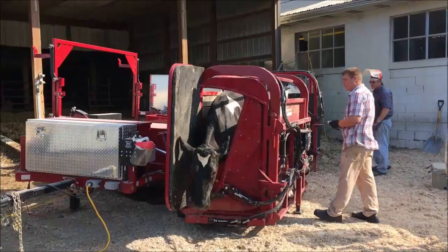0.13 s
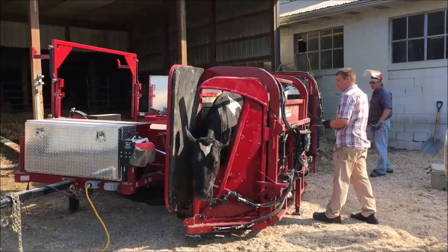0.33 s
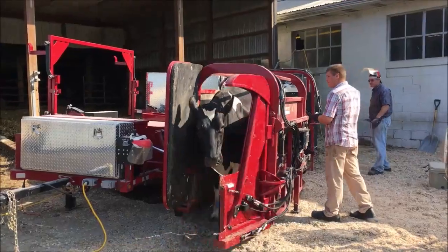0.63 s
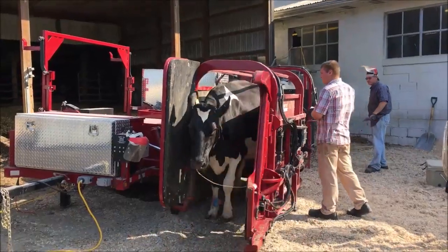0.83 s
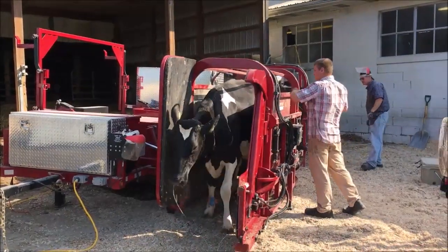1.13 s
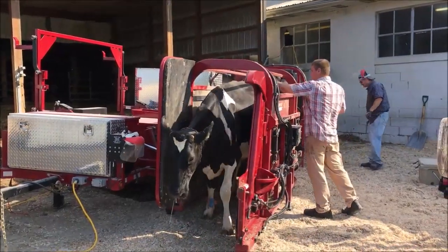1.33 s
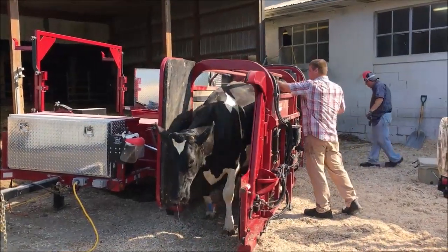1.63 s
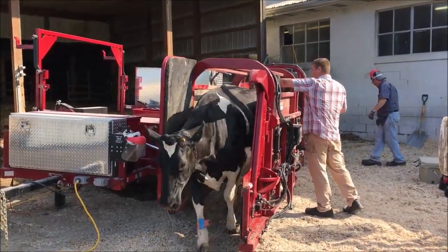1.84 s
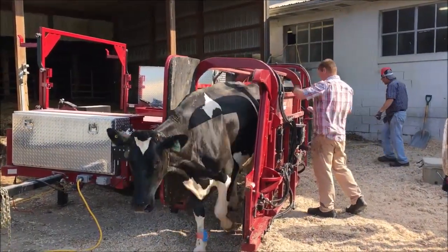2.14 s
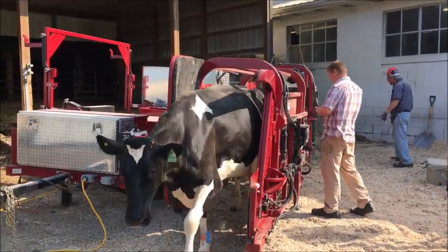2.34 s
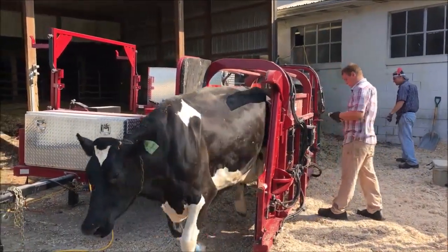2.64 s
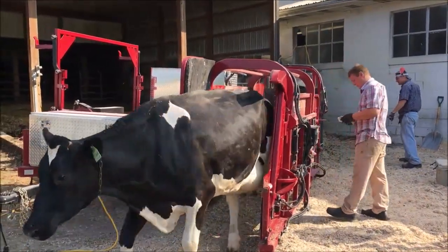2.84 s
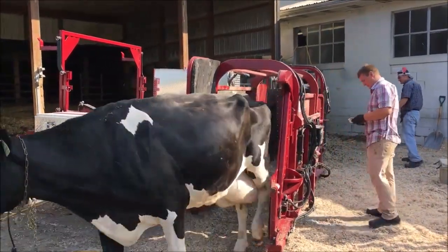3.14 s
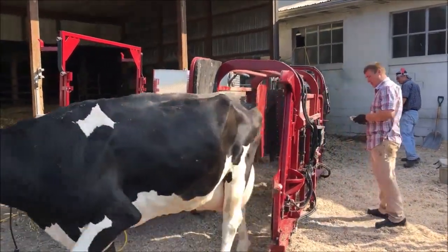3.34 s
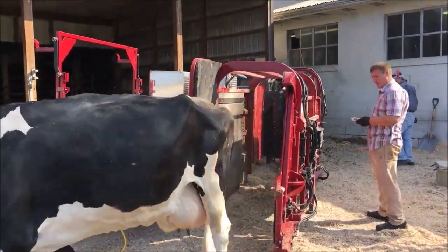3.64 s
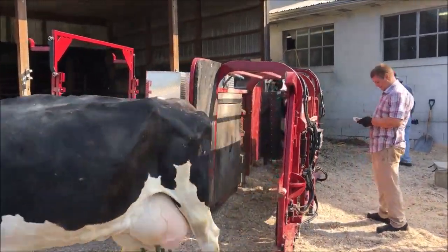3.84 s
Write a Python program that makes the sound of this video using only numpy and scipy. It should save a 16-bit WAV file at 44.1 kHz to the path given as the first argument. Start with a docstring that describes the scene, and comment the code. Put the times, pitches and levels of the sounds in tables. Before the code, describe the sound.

A steel cattle chute rattles, then its latch clatters and the gate bangs repeatedly in a barnyard. A hinge squeaks briefly and hooves knock and scuff on gravel, while machinery noise and wind on the microphone build.

```python
"""A steel cattle chute rattles as a cow leaves it in a barnyard. Impacts excite the modes of the metal:
the head gate's frame bangs, its latch clatters and loose fittings tick, while stick-slip friction
makes a hinge squeak. Hooves knock on the resonant hollow floor and scuff the gravel.
Behind it the broadband rush of machinery fades in from silence as the recorder's gain rises,
and turbulent wind buffets the microphone."""
import sys
import numpy as np
from scipy import signal
from scipy.fft import rfft, irfft
from scipy.io import wavfile
from scipy.ndimage import uniform_filter1d

SR = 44100
rng = np.random.default_rng(int(sys.argv[2]) if len(sys.argv) > 2 else 0)


def waveform_to_disk(signal):
    """Save audio, clipped to [-1, 1], as 16-bit WAV at the path in sys.argv[1]."""
    frames = np.transpose(np.atleast_2d(signal))
    scaled = np.clip(frames, -1, 1) * 32767
    samples = np.round(scaled).astype(np.int16)
    wavfile.write(sys.argv[1], SR, samples)


N = 176400


def undb(db):
    """Decibels to amplitude ratio."""
    return 10 ** (np.asarray(db) / 20)


def unit(x):
    """Normalise to rms 1."""
    return x / np.sqrt(np.mean(x ** 2))


def curve(points):
    """Linear interpolation through (seconds, value) points."""
    return np.interp(np.arange(N) / SR, *np.array(points).T)


def colour(x, points, tilt=0, top_hz=16000):
    """Spectral shaping by (Hz, dB) points, tilted in dB per octave up to top_hz; rms 1."""
    octave = np.log2(np.fft.rfftfreq(len(x), 1 / SR) + 1)
    hz, db = np.array(points).T
    slope = tilt * np.clip(octave, np.log2(hz[1]), np.log2(top_hz))
    return unit(irfft(rfft(x) * undb(np.interp(octave, np.log2(hz), db) + slope), len(x)))


def lowpass(x, hz):
    """Zero-phase filtering keeps the part of x below hz."""
    return signal.sosfiltfilt(signal.butter(2, hz, fs=SR, output="sos"), x)


def grains(size, grit=0.59):
    """Granular noise: tiny contacts whose strengths spread log-normally with grit."""
    noise, strength = rng.standard_normal((2, size))
    return noise * np.exp(grit * strength)


def walk(rate):
    """Smooth random fluctuation of rms 1, with rate new values a second."""
    hold = int(SR / rate)
    steps = np.repeat(rng.standard_normal(N // hold + 1), hold)
    return unit(uniform_filter1d(uniform_filter1d(steps, hold), hold)[:N])


def fade(t, t60):
    """Exponential damping by 60 dB in t60 seconds."""
    return np.exp(-np.log(1000) * t / t60)


def add(out, start, x):
    """Superpose x on out from start seconds."""
    i = int(start * SR)
    out[i:i + len(x)] += x[:max(N - i, 0)]


def ripple(x, depth_db, spacing_hz=44.81):
    """Dense fixed resonances form an uneven minimum-phase response of unit mean power."""
    f = np.fft.rfftfreq(N, 1 / SR)
    peaks = np.interp(f / spacing_hz, np.arange(2048), rng.standard_normal(2048))
    db = depth_db * peaks * f / (f + 900)  # smoother in the bass
    cepstrum = irfft(np.log(undb(db)), N)
    response = np.exp(rfft(2 * cepstrum * (np.arange(N) < N // 2)))
    return irfft(rfft(x) * response / np.sqrt(np.mean(np.abs(response) ** 2)), N)


def bursts(rows, shape, grit, rise):
    """Transient noise: grains filtered by shape peak at rise times their length, then decay."""
    out, t = np.zeros(N), np.arange(SR // 2) / SR
    for start, db, length in rows:
        age = t / (length * rise)
        burst = colour(grains(len(t), grit), shape) * age * np.exp(1 - age)
        add(out, start, undb(db) * burst / np.sqrt(np.sum(burst ** 2) / (2 * length * rise * SR)))
    return out


# Spectrum of the rush. Each row: frequency in Hz, spectral density in dB.
RUSH_SPECTRUM = [(30, -15), (120, -9.5), (250, 4.5), (370, -9), (520, -0.5), (700, 0.5), (870, -1.5),
                 (1100, -1), (1300, -1), (2000, -3), (3200, -7), (5000, -15.5), (6000, -15.5),
                 (9200, -17.5), (10400, -20), (11500, -16.5), (16000, -19.5)]
# Fan and pump resonances. Each row: frequency in Hz, half-width in Hz, level in dB against the rush.
WHIR_RESONANCES = [(451, 22, -23), (682, 33, -16.5), (1007, 59, -14), (1117, 37, -16), (3080, 35, -24.5),
                   (4370, 74, -28)]
# Fade-in of the rush as the recorder's gain rises. Each row: time in seconds, level in dB.
RUSH_FADE_IN = [(0, -125), (.145, -110), (.175, -70), (.3, -58.5), (.45, -61), (.68, -57.5), (.95, -51),
                (1.3, -48.5), (1.7, -47), (2.2, -45.5), (2.7, -44.5), (3.05, -41.5), (3.4, -42), (4, -41)]


def machinery(hiss_hz=6000, flicker_db=0.92):
    """Broadband noise with fan and pump resonances fades in and brightens as the recorder's gain rises."""
    rush = ripple(colour(grains(N, grit=0.3), RUSH_SPECTRUM), depth_db=3.5)
    body = lowpass(rush, hiss_hz)
    hiss = (rush - body) * undb(-4.5 + 0.5 * np.arange(N) / SR)  # gains 0.5 dB a second on the body
    f = np.fft.rfftfreq(N, 1 / SR)
    air = rfft(rng.standard_normal(N))
    whir = sum(undb(db) * unit(irfft(air / (1 + ((f - hz) / width) ** 2), N))
               for hz, width, db in WHIR_RESONANCES)
    return (body * undb(flicker_db * walk(24.905)) + hiss + whir) * undb(curve(RUSH_FADE_IN))


# Knocks of the cow on floor and panels. Each row: start in seconds, level in dB, length in seconds.
PANEL_KNOCKS = [(0.227, -50, .015), (0.246, -44.5, 0.0091), (0.493, -51, 0.013), (0.517, -38.5, 0.016),
                (.571, -44, 0.023), (2.902, -40.5, 0.041), (2.998, -45, .012), (3.095, -41.5, .025)]
# Panel resonances. Each row: frequency in Hz, bandwidth in Hz, level in dB.
PANEL_RESONANCES = [(401, 134, -5.5), (593, 100, -1), (744, 120, -2.5), (1400, 340, -11.5)]


def panels(grit=0.38, rise=0.36):
    """Forced vibration: blunt contacts drive broad resonances of the hollow floor and side panels."""
    out, t = np.zeros(N), np.arange(SR // 4) / SR
    for start, db, length in PANEL_KNOCKS:
        age = t / (length * rise)
        force = grains(len(t), grit) * age * np.exp(1 - age)
        boom = np.zeros(len(t))
        for hz, width, mode_db in PANEL_RESONANCES:
            band = signal.butter(2, [hz - width / 2, hz + width / 2], "bandpass", fs=SR, output="sos")
            boom += undb(mode_db) * unit(signal.sosfilt(band, force))
        add(out, start, undb(db) * boom / np.sqrt(np.sum(boom ** 2) / (2 * length * rise * SR)))
    return out


# Ticks of loose fittings. Each row: start in seconds, level in dB, centre frequency in Hz.
FITTING_TICKS = [(0.23, -53.5, 7700), (.255, -51, 8150), (0.347, -55, 8500), (.467, -46, 4180),
                 (.444, -53, 12000), (0.559, -43, 9900), (0.588, -53, 11200), (0.975, -39, 11600),
                 (1.171, -38, 9700), (1.281, -46, 6800), (1.397, -32.5, 10600), (1.504, -45, 11000),
                 (1.679, -44.5, 8200), (1.882, -49, 8950), (2.775, -42.5, 14000), (3.255, -39, 13100),
                 (3.514, -37.5, 13000)]


def fittings(attack_s=0.0023, t60=0.037, half_width_octaves=0.73):
    """Light impacts of chain and hose fittings radiate quickly damped bands of high-frequency noise."""
    out, t = np.zeros(N), np.arange(SR // 8) / SR
    f = np.fft.rfftfreq(len(t), 1 / SR) + 1
    for start, db, hz in FITTING_TICKS:
        band = 1 / (1 + (np.log2(f / hz) / half_width_octaves) ** 2)
        tick = unit(irfft(rfft(grains(len(t))) * band, len(t)))
        add(out, start, undb(db) * tick * (1 - np.exp(-t / attack_s)) * fade(t, t60))
    return ripple(out, depth_db=2)


# Partials of the squeak. Each row: start in seconds, length in seconds, frequency in Hz, level in dB.
HINGE_PARTIALS = [(0.231, .045, 7700, -61), (0.246, 0.032, 8620, -61), (1.876, 0.021, 11400, -57),
                  (1.881, 0.08, 9250, -47.5), (1.878, 0.089, 5814, -54), (1.892, 0.092, 4750, -61),
                  (1.921, .045, 8900, -52), (1.96, 0.12, 8720, -64), (1.935, 0.063, 10465, -62)]
# Scrapes of the hinge. Each row: start in seconds, level in dB, length in seconds.
HINGE_SCRAPES = [(1.878, -51, 0.029), (1.95, -53, .04)]
# Spectrum of a scrape. Each row: frequency in Hz, spectral density in dB.
SCRAPE_SPECTRUM = [(300, -10), (1500, 13), (3500, -2), (5500, 4), (8000, -5), (12000, 0), (16000, -18)]


def hinge(waver=0.0026, roughness=0.46):
    """Stick-slip friction sustains thin, uneven partials that swell and die, with brief scraping noise."""
    squeak = np.zeros(N)
    for start, length, hz, db in HINGE_PARTIALS:
        n = int(length * SR)
        pitch = hz * (1 + waver * walk(700)[:n])
        jitter = walk(400)[:n] + 1j * walk(410)[:n]  # in amplitude and phase
        grip = (1 + roughness * jitter) / np.sqrt(1 + 2 * roughness ** 2)
        partial = np.imag(grip * np.exp(2j * np.pi * np.cumsum(pitch) / SR))
        add(squeak, start, undb(db) * np.hanning(n) * partial)
    return squeak + bursts(HINGE_SCRAPES, SCRAPE_SPECTRUM, grit=0.35, rise=0.54)


def struck_steel(blows, spectrum, modes, attack_s, crash_t60, tail_t60, tilt_top_hz):
    """Impact excites a crash of dense modes and a few longer rings; the barn adds a duller tail."""
    out, t = np.zeros(N), np.arange(SR // 2) / SR
    hz, mode_db, ring_t60 = np.array(modes).T[:, :, None]
    for start, db, tilt, ring_db in blows:
        crash = colour(grains(len(t)), spectrum, tilt, tilt_top_hz) * fade(t, crash_t60)
        tail = colour(rng.standard_normal(len(t)), spectrum, tilt - 3.5, tilt_top_hz) * fade(t, tail_t60)
        scatter, detune, phase = rng.standard_normal((3, len(modes), 1))  # no two blows ring alike
        gain = undb(mode_db + 3 * scatter + tilt * np.log2(hz))
        pitch = hz * (1 + 0.008 * detune)
        partials = gain * fade(t, ring_t60) * np.sin(2 * np.pi * (pitch * t + phase))
        ring = partials.sum(0) / np.sqrt(np.sum(gain ** 2) / 2)
        onset = 1 - np.exp(-t / attack_s)
        add(out, start, undb(db) * onset * (crash + undb(-10) * tail + undb(ring_db) * ring))
    return out


# Blows on the gate and frame.
# Each row: start in seconds, level in dB, tilt in dB per octave, ring in dB against the crash.
FRAME_BLOWS = [(.233, -44.5, -1, -12), (.255, -44.5, -1.5, -5), (.287, -48, -6, -7),
               (.313, -44.5, 0.5, -10), (.347, -49, -5.5, -7), (.490, -45, 4, -13), (.520, -40.5, 5, -15),
               (.533, -40, -3, -3), (.559, -38, 0.5, -20), (.578, -42, 1, -4), (1.025, -35, -3, -2),
               (1.063, -34, 2.5, -14), (1.101, -30.5, .5, -12), (1.125, -38.5, -14.5, -4.5),
               (1.149, -37, 0.5, -1.5), (1.178, -36.5, -.5, -3), (1.195, -33.5, -1, -11),
               (1.215, -40.5, -2.5, -7), (1.236, -36.5, -5, -6), (1.279, -40.5, 4.5, -4),
               (1.306, -35.5, -4.5, -7), (1.357, -34, 0, -5.5), (1.383, -38.5, -1.5, -10),
               (1.402, -41, -3, -5), (1.514, -30.5, 3, -12), (1.541, -34.5, 1, -1),
               (1.575, -38.5, -5, -3.5), (1.612, -46, -24, -6), (1.655, -39.5, -5, -2.5),
               (1.897, -43.5, 1.5, -6)]
# Spectrum of the frame's crash. Each row: frequency in Hz, spectral density in dB.
FRAME_SPECTRUM = [(40, -36), (150, -12), (340, -7), (600, -0.5), (1000, -4.5), (1500, -4.5), (2200, -8),
                  (3600, -11.5), (5200, -21), (9000, -30), (16000, -38)]
# Modes of the frame. Each row: frequency in Hz, level in dB, 60 dB decay time in seconds.
FRAME_RESONANCES = [(169.3, -3.5, 0.28), (276, -2.5, 0.32), (461.6, -7.5, 0.19), (568, -4.5, 0.6),
                    (681, 1.5, 0.24), (748.4, -3.5, 0.39), (952, 0, 0.22), (1310, -16, 0.064),
                    (1576, 7, 0.081), (1800, 8, 0.037), (2710, 0, 0.11), (3435, 10.5, 0.045),
                    (3620, 2, 0.1)]


def frame():
    """Free vibration: the large steel gate and frame bang and ring on in low, slowly decaying modes."""
    bangs = struck_steel(FRAME_BLOWS, FRAME_SPECTRUM, FRAME_RESONANCES,
                         attack_s=0.0022, crash_t60=0.085, tail_t60=0.32, tilt_top_hz=3380)
    return ripple(bangs, depth_db=1.2)


# Spectrum of the turbulence. Each row: frequency in Hz, spectral density in dB.
WIND_SPECTRUM = [(15, -64), (32, -12), (45, -3.5), (65, 2), (110, -2.5), (160, -7.5), (250, -17.5),
                 (400, -30.5), (1000, -71), (4000, -82)]
# Envelope of the rumble. Each row: time in seconds, level in dB.
WIND_ENVELOPE = [(0, -125), (.15, -100), (.25, -74.5), (.42, -60.5), (.5, -49.5), (.7, -55), (.95, -52),
                 (1.1, -45), (1.33, -37.5), (1.45, -43), (1.7, -38), (1.87, -44.5), (1.97, -45), (2.2, -43),
                 (2.7, -45.5), (2.83, -37.5), (3.2, -35.5), (3.35, -41), (3.55, -34.5), (3.72, -40.5),
                 (4, -37.5)]
# Sharp buffets. Each row: start in seconds, level in dB, length in seconds.
WIND_BUFFETS = [(1.335, -34, 0.009), (2.29, -32.5, 0.013), (2.332, -29, 0.014), (2.482, -35, 0.041),
                (2.548, -30.5, 0.031), (2.965, -36, 0.013), (3.12, -34.5, 0.056), (3.845, -31, 0.04)]


def wind(gust_db=0.86, deep_hz=64.4, deep_full_s=2.2, deep_db_per_s=4):
    """Turbulent pressure on the microphone rumbles and buffets; the lowest band builds up last."""
    rumble = colour(rng.standard_normal(N), WIND_SPECTRUM)
    deep_gain = undb(deep_db_per_s * np.minimum(np.arange(N) / SR - deep_full_s, 0))
    rumble += (deep_gain - 1) * lowpass(rumble, deep_hz)
    gusts = undb(curve(WIND_ENVELOPE) + gust_db * walk(7.9))
    return rumble * gusts + bursts(WIND_BUFFETS, WIND_SPECTRUM, grit=0.056, rise=0.44)


# Blows on the latch.
# Each row: start in seconds, level in dB, tilt in dB per octave, ring in dB against the crash.
LATCH_BLOWS = [(.969, -32.5, -1, 2.5), (.976, -32, 0.5, -8), (1.006, -40, -3, -2), (1.019, -39, 1.5, 4.5),
               (1.054, -35.5, 6.5, -17), (1.058, -35, 2, -7), (1.075, -43, 1, -5), (1.087, -39.5, -2, -4),
               (1.613, -42, -1, 0)]
# Spectrum of the latch's crash. Each row: frequency in Hz, spectral density in dB.
LATCH_SPECTRUM = [(100, -25), (400, -4), (900, -3), (2000, -2.5), (4000, -4.5), (5500, -5.5), (9000, -8.5),
                  (16000, -22.5)]
# Modes of the latch. Each row: frequency in Hz, level in dB, 60 dB decay time in seconds.
LATCH_RESONANCES = [(678, -2, 0.19), (926, -1, 0.13), (1290, -3, .09), (1545, -7, 0.066), (2740, -9, 0.12),
                    (3420, 1, 0.044), (3936, 4.5, 0.062), (4080, 4, 0.046), (4339, 0, 0.033),
                    (5000, -18, 0.13), (5660, -3, 0.071), (7580, -7, 0.07), (8640, -6, 0.091),
                    (9500, -12, .08), (11600, -6, .05)]


def latch():
    """Repeated impacts set the small steel latch clattering in high, quickly damped modes."""
    clanks = struck_steel(LATCH_BLOWS, LATCH_SPECTRUM, LATCH_RESONANCES,
                          attack_s=0.0016, crash_t60=0.062, tail_t60=0.2, tilt_top_hz=11000)
    return ripple(clanks, depth_db=2.2)


# Hoof scuffs. Each row: start in seconds, level in dB, length in seconds.
HOOF_SCUFFS = [(2.895, -42, 0.044), (2.992, -37, 0.016), (3.035, -40.5, 0.018), (3.835, -44.5, 0.037)]
# Spectrum of the gravel. Each row: frequency in Hz, spectral density in dB.
GRAVEL_SPECTRUM = [(100, -4), (300, 8), (550, 4.5), (800, 1), (1400, 3), (3500, -8.5), (6000, -20),
                   (16000, -39)]


def gravel():
    """Granular friction: many tiny stone contacts under a hoof merge into a short scuff."""
    return bursts(HOOF_SCUFFS, GRAVEL_SPECTRUM, grit=0.78, rise=0.5)


def scene():
    """Superposition of all sources, alike in both ears."""
    mix = machinery() + panels() + fittings() + hinge() + frame() + wind() + latch() + gravel()
    return np.tile(mix, (2, 1))


def record(dry):
    """Band limiting: a steep low-pass filter cuts the treble above 15.9 kHz."""
    return signal.sosfilt(signal.ellip(10, 0.2, 70, 15900, fs=SR, output="sos"), dry)


dry = scene()
out = record(dry)
waveform_to_disk(out)
```